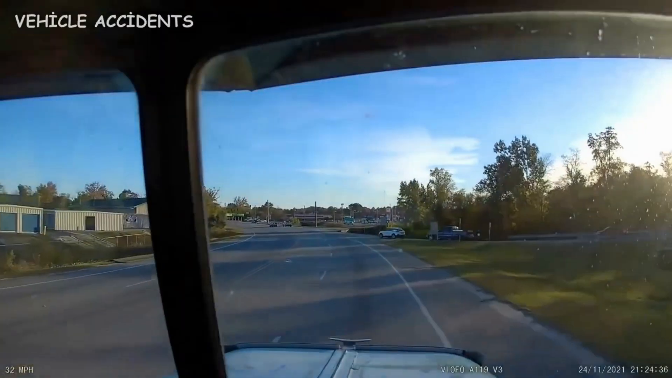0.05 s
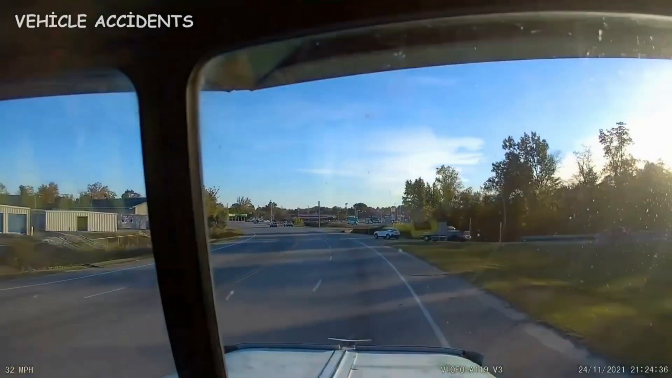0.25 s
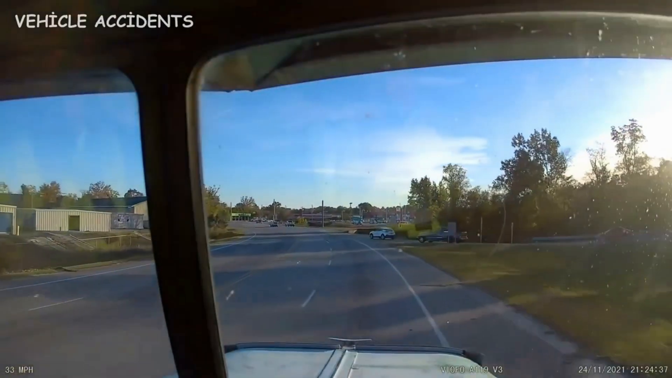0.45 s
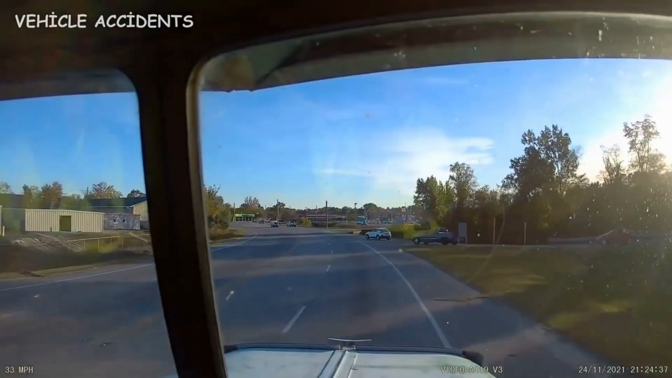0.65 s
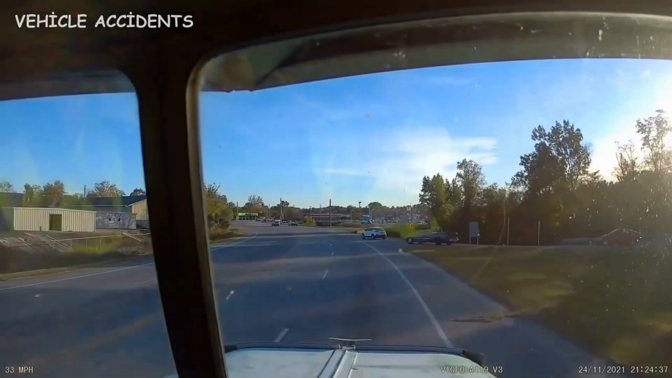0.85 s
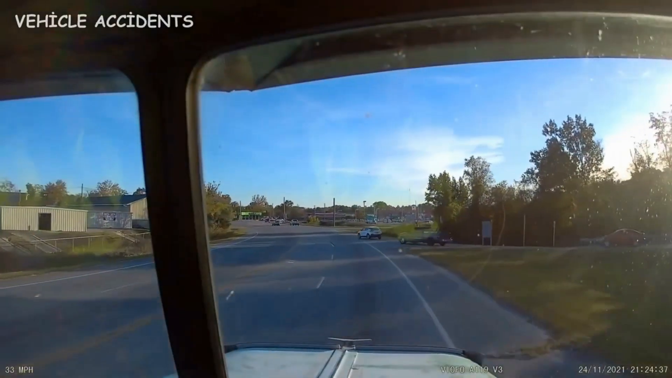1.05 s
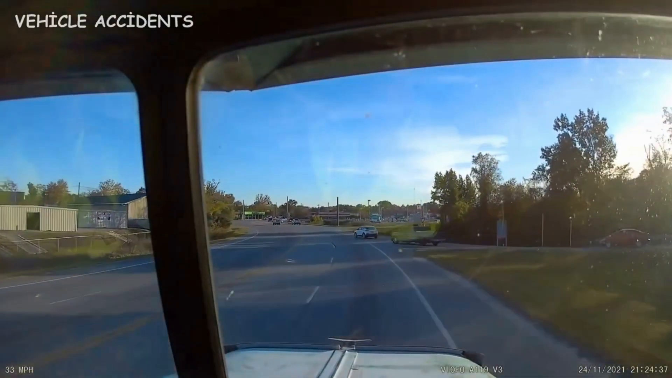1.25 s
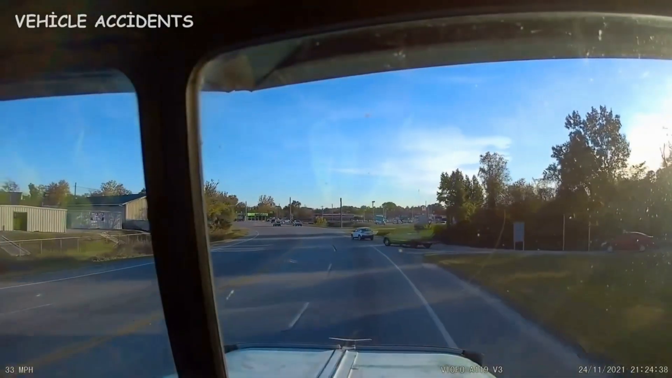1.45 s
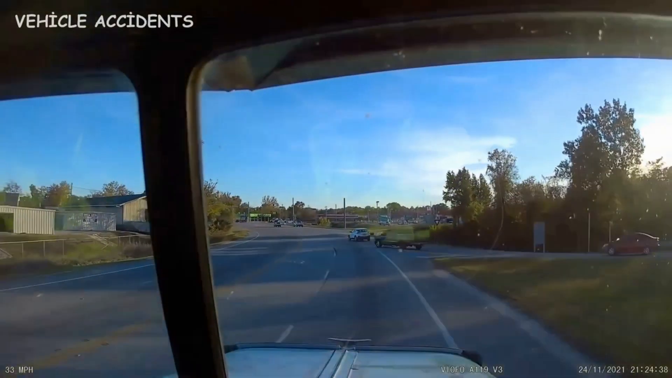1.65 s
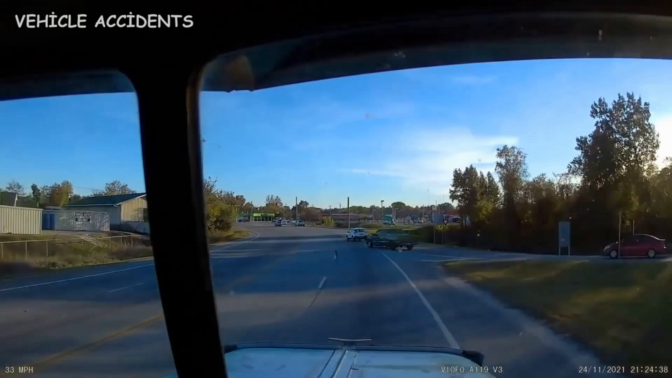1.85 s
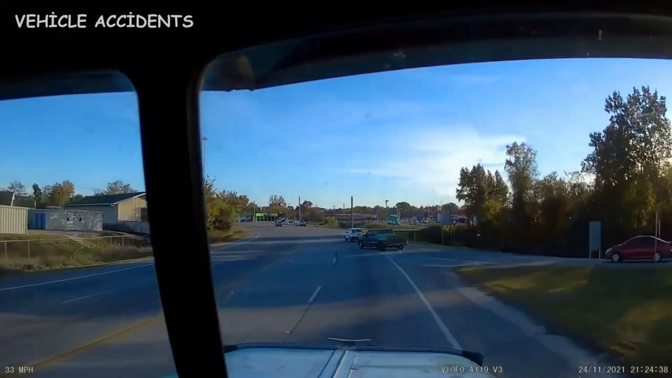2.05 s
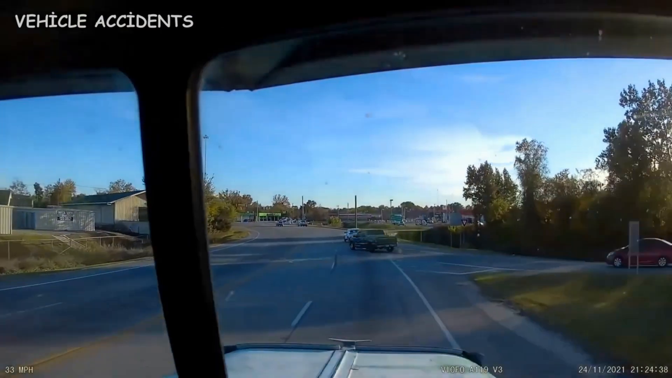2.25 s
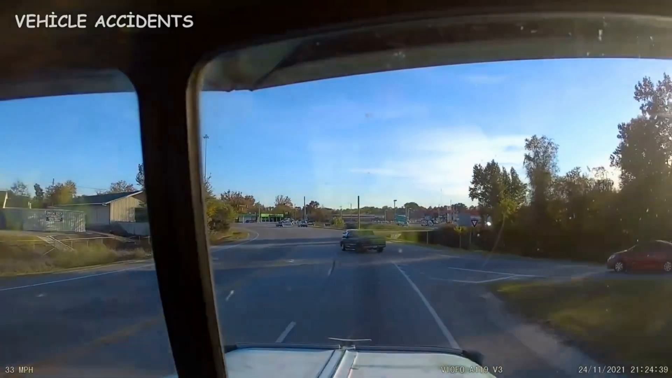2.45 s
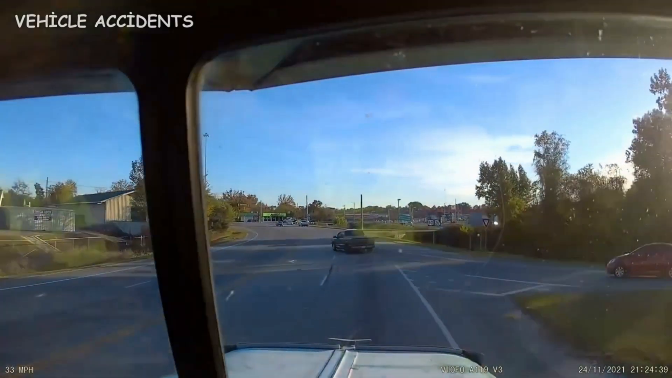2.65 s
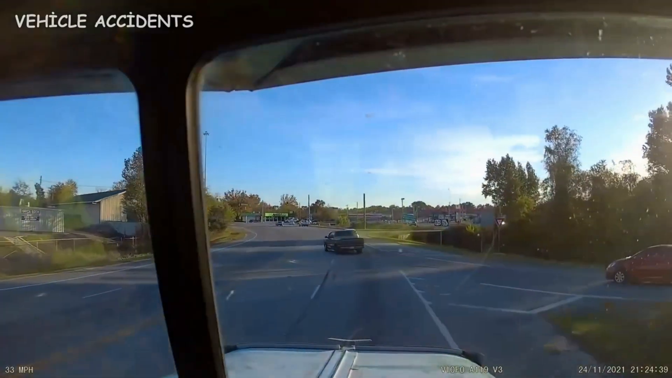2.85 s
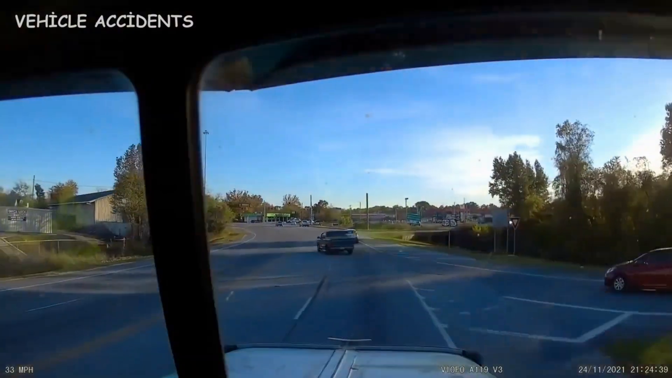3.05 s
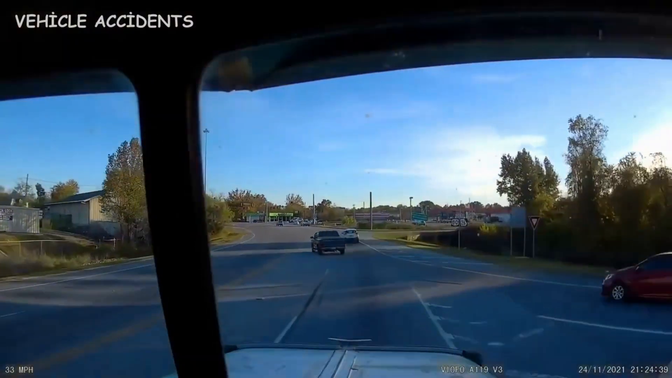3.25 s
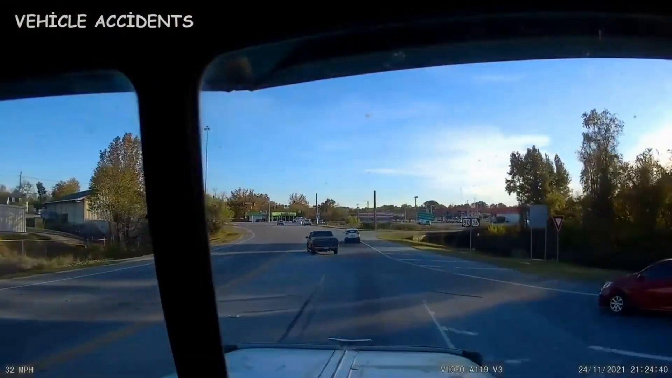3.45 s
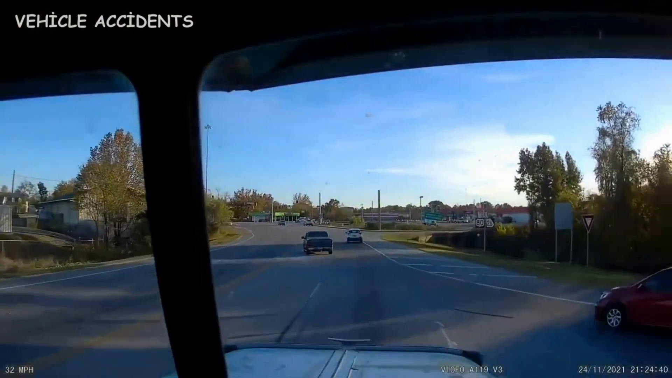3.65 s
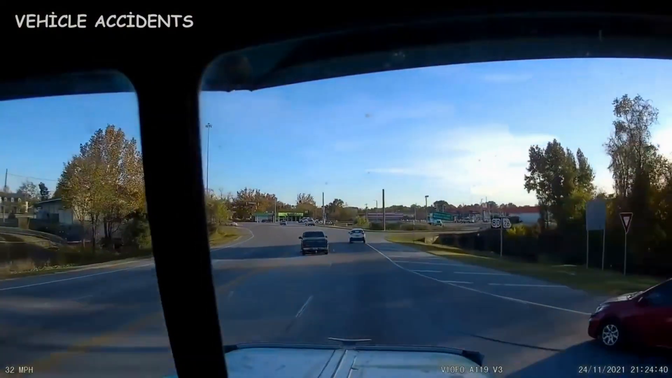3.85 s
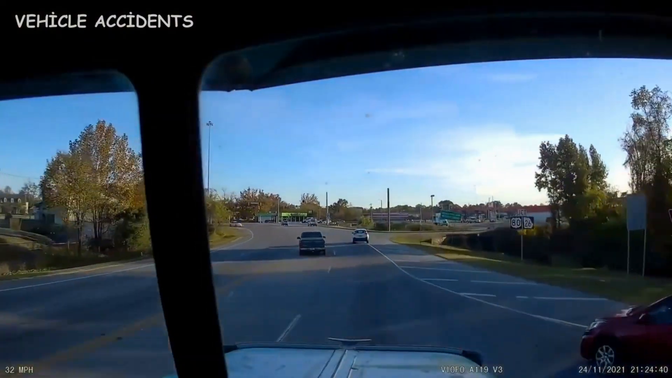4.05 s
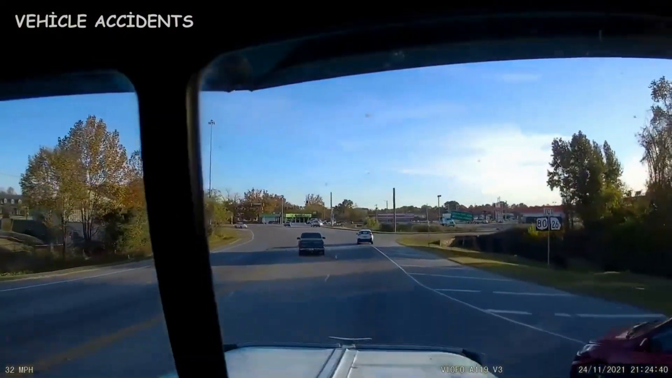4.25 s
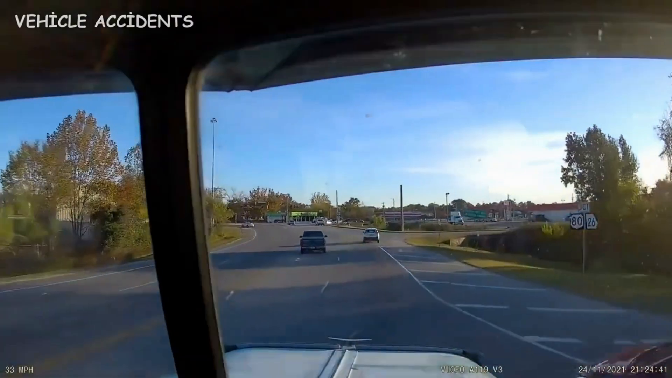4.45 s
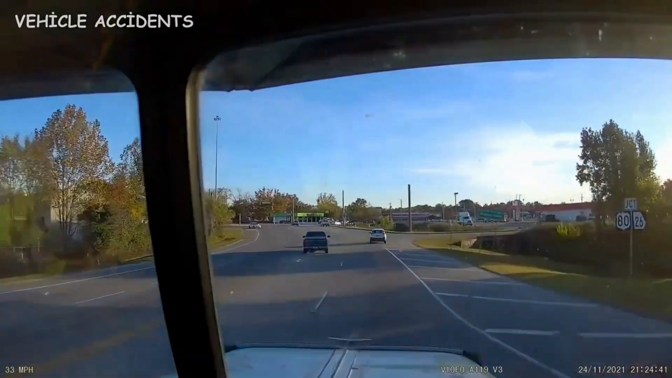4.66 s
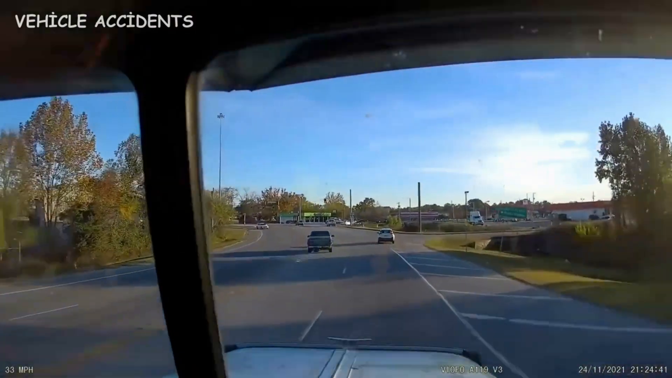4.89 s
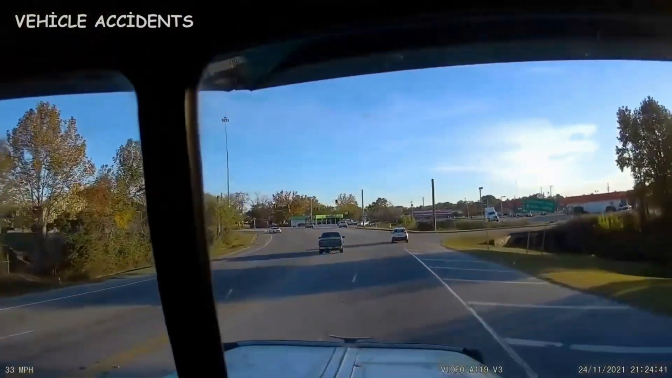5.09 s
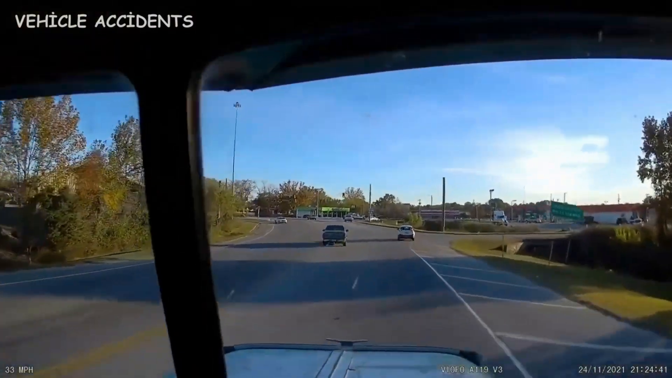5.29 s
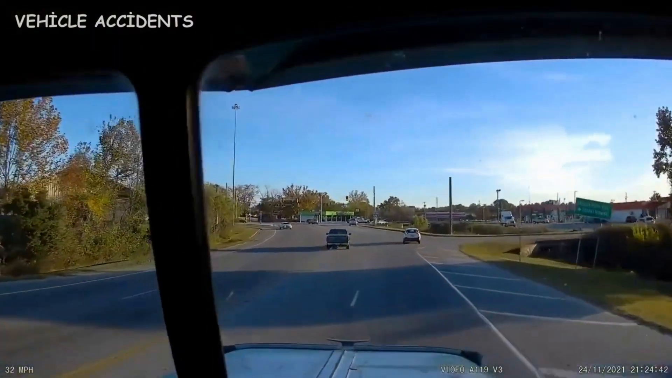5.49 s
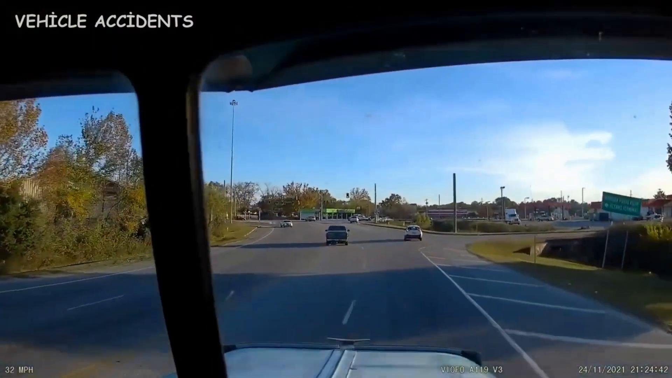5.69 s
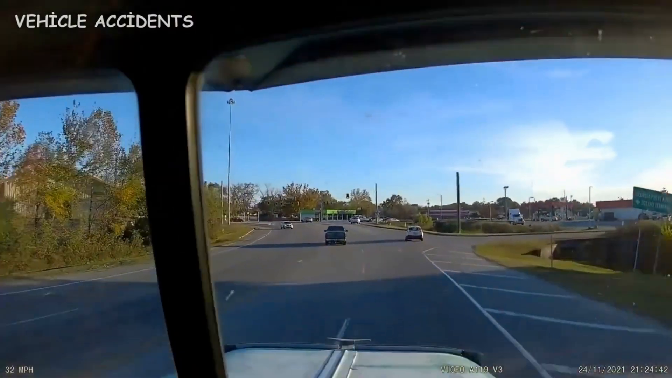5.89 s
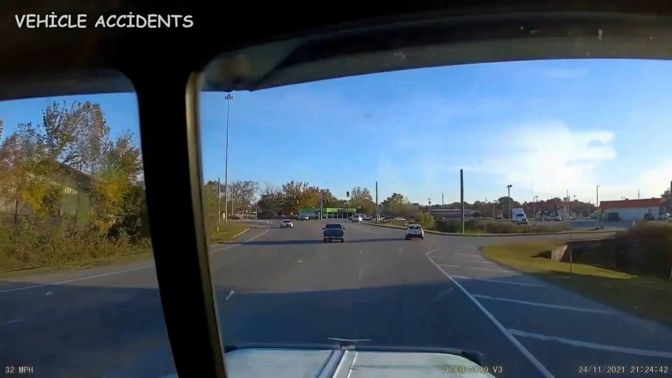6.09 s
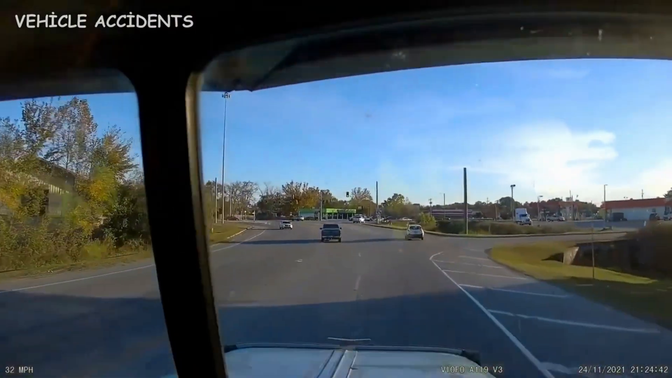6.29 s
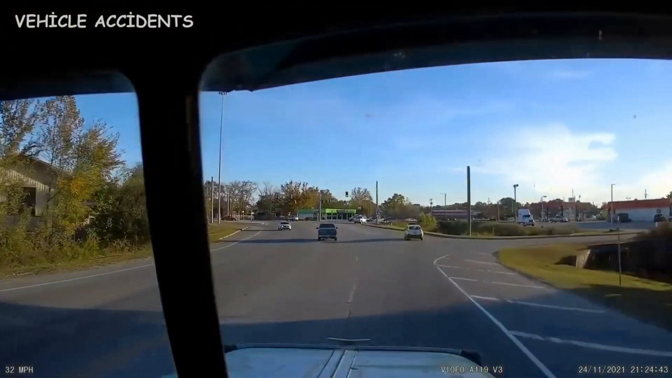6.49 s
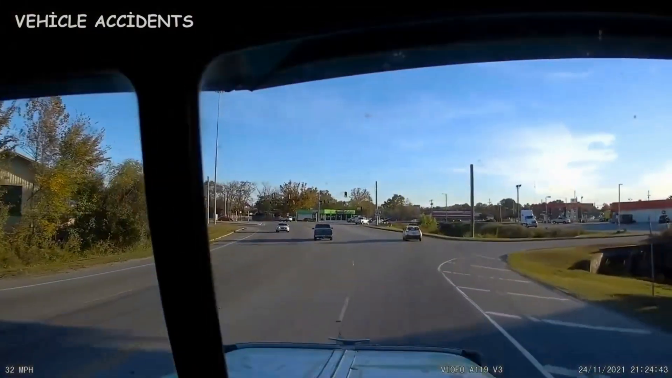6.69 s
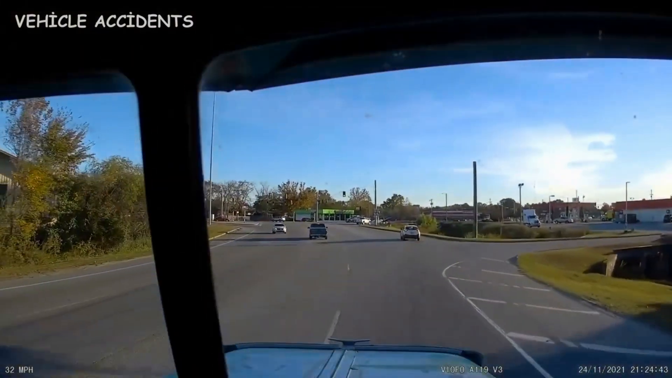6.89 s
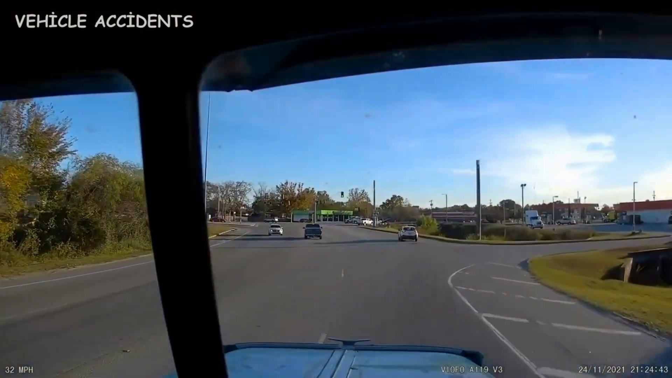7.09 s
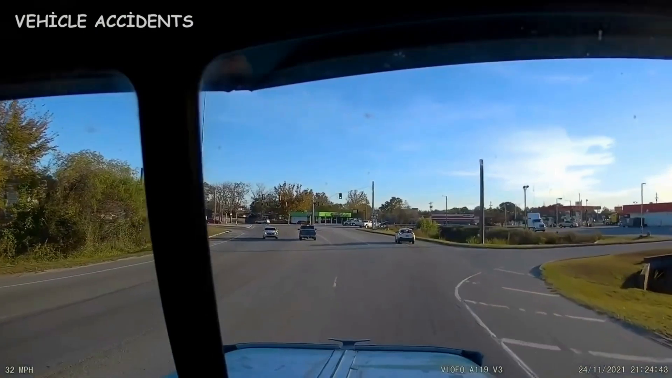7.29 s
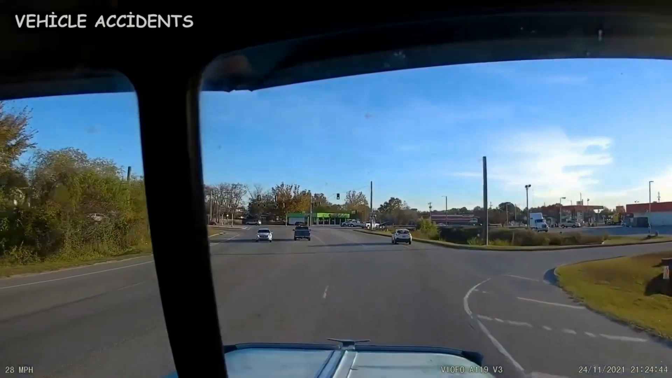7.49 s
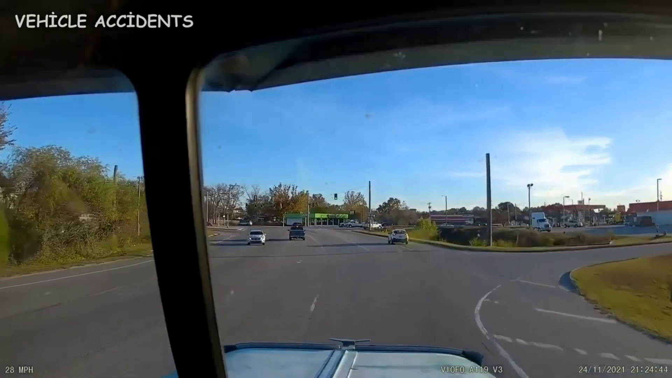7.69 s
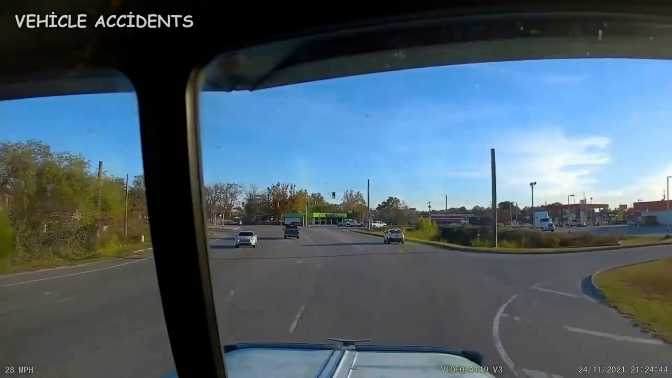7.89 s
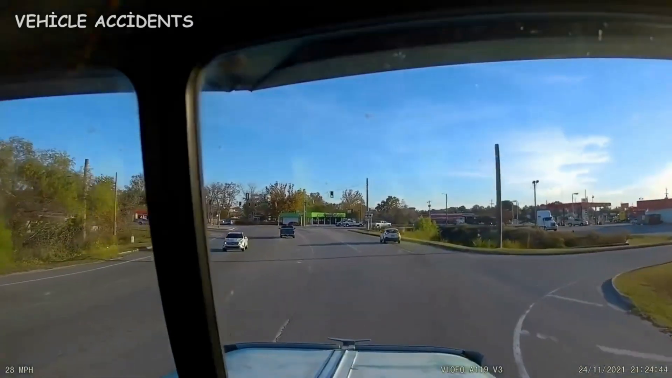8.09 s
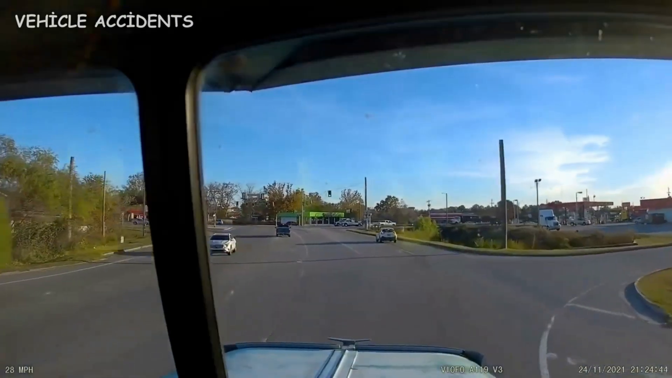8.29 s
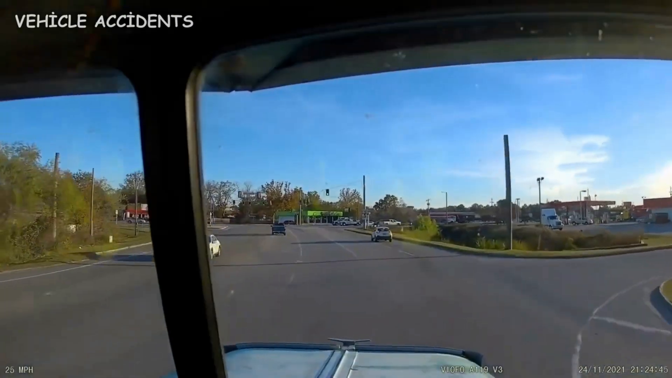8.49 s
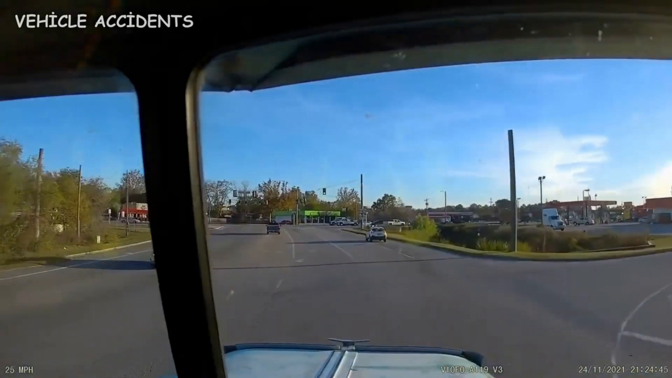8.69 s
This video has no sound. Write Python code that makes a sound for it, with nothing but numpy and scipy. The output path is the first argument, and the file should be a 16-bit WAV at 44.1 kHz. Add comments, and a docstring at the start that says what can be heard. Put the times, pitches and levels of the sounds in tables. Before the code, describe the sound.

Inside a rolling diesel truck cab, steady engine throb and tyre roar, then a short low air horn blast and a long crunching metal collision.

```python
"""A car strikes a diesel truck, heard in its cab: a long crunch of snaps, buckles, boom and heave,
with a second sharp bang; panels, parts and loose fittings ring, rattle and settle, scraps drop.
Just before, the driver yanks the air horn: a sum of harmonics with a rasp at each puff.
Under it the engine throbs (a sum of cycle orders), then slows off load, over filtered-noise
tyre roar and chassis rumble; two short whines and a long low hum sound as the truck slows."""
import sys
import numpy as np
from scipy import signal
from scipy.fft import rfft, irfft
from scipy.io import wavfile
from scipy.ndimage import uniform_filter1d

SR = 44100
rng = np.random.default_rng(int(sys.argv[2]) if len(sys.argv) > 2 else 0)


def generate_wav(signal):
    """Clip the signal to [-1, 1] and save it as 16-bit WAV at the path in sys.argv[1]."""
    frames = np.transpose(np.atleast_2d(signal))
    scaled = np.clip(frames, -1, 1) * 32767
    pcm = np.round(scaled).astype(np.int16)
    wavfile.write(sys.argv[1], SR, pcm)


N = 385413
TIME = np.arange(N) / SR
# In all tables dB is relative: gains, flutter and filters downstream add to it.


def amp(db):
    """Decibels to gain."""
    return 10 ** (np.asarray(db) / 20)


def unit(x):
    """Scales to rms 1."""
    return x / np.sqrt(np.mean(x ** 2) + 1e-20)


def since(s):
    """Seconds since a moment, zero before it."""
    return np.maximum(TIME - s, 0)


def decay60(t, t60_s):
    """Exponential decay, -60 dB at t60."""
    return np.exp(-np.log(1000) * t / t60_s)


def curve(rows):
    """Rows of t/s, value, joined by straight lines."""
    return np.interp(TIME, *np.transpose(rows))


def read(points, hz):
    """Spectrum in dB on a log-frequency axis, falling 30 dB/octave beyond its ends."""
    f, db = np.transpose(points)
    octave = np.log2(hz + 1)
    beyond = abs(octave - np.clip(octave, np.log2(f[0]), np.log2(f[-1])))
    return np.interp(octave, np.log2(f), db) - 30 * beyond


def colour(x, points, size=8192):
    """Minimum-phase filter with the given spectrum; keeps the power of white noise."""
    db = read(points, abs(np.fft.fftfreq(size, 1 / SR)))
    log_gain = np.log(amp(np.maximum(db, -100)))
    taps = np.fft.ifft(np.exp(np.conj(signal.hilbert(log_gain)))).real[:size // 2]
    return signal.oaconvolve(x, taps / np.linalg.norm(taps))[:N]


def butter(x, order, hz, kind="low"):
    """Butterworth filter."""
    return signal.sosfilt(signal.butter(order, hz, kind, fs=SR, output="sos"), x)


def ring(x, modes):
    """Parallel resonances: f/Hz, width/Hz, level/dB."""
    return sum(amp(db) * signal.lfilter(*signal.iirpeak(hz, hz / width, SR), x)
               for hz, width, db in modes)


def noise():
    """White noise of rms 1."""
    return rng.standard_normal(N)


def drift(rate_hz):
    """Slow random motion of rms 1, low-passed near rate_hz."""
    times = TIME[::32]
    hz = np.fft.rfftfreq(len(times), times[1])
    spectrum = rfft(rng.standard_normal(len(times))) / (1 + (hz / rate_hz) ** 4)
    return np.interp(TIME, times, unit(irfft(spectrum, len(times))))


def grains(per_s, spread_db):
    """Random tiny impacts of rms 1, their sizes spread exponentially in dB."""
    size = amp(spread_db * np.minimum(rng.exponential(1, N), 4))
    return unit(rng.choice([-1, 1], N) * size * (rng.random(N) < per_s / SR))


def strikes(rows, rise_s):
    """Envelope of blows that rise fast and die away: t/s, level/dB, t60/s."""
    power = np.zeros(N)
    for s, db, t60 in rows:
        start = round(s * SR)
        t = TIME[:N - start][:SR]
        blow = amp(db) * (1 - np.exp(-t / rise_s)) * decay60(t, t60)
        power[start:start + len(t)] += blow ** 2
    return np.sqrt(power)


def surges(rows):
    """Envelope of pushes that build to a peak and die away: t/s, level/dB, build/s, t60/s."""
    return np.sqrt(sum((amp(db) * np.exp(-np.maximum(s - TIME, 0) / build) * decay60(since(s), t60)) ** 2
                       for s, db, build, t60 in rows))


SLOWING_S = 5.04


def rolling(db, fade_db_per_s):
    """Gain of a rolling sound: steady, then fading linearly in dB as the truck slows."""
    return amp(db - fade_db_per_s * since(SLOWING_S))


# Partials of a struck part: f/pitch (before mistuning), level/dB
PART_MODES = [(1, 2), (1.07, -6), (1.43, -13.5), (1.83, -8), (2.8, -10.5), (3.27, -16.5)]


def clank(hz, t60_s, contact_cycles=1.36, damping=0.3, mistune=0.027):
    """One struck part: uneven partials, higher ones dying sooner; a large part is slow to start."""
    t, out = TIME[:SR // 4], 0
    for ratio, db in PART_MODES:
        partial_hz = hz * ratio ** (1 + mistune * rng.standard_normal())
        tone = np.sin(2 * np.pi * (partial_hz * t + rng.random()))
        out = out + amp(db) * decay60(t * ratio ** damping, t60_s) * tone * (partial_hz < SR / 2)
    return out * (1 - np.exp(-t * hz / contact_cycles))


def shards(hits, low_hz, high_hz, t60_s, count=40):
    """Each hit rings one random piece, from large and low to small and high; rms 1."""
    pieces = [clank(hz, t60_s * np.sqrt(low_hz / hz)) for hz in np.geomspace(low_hz, high_hz, count)]
    which, out = rng.integers(0, count, N), np.zeros(N + SR)
    for at in np.flatnonzero(hits):
        out[at:at + len(pieces[0])] += hits[at] * pieces[which[at]]
    return unit(out[:N])


# Spectra of crumpling metal, cab boom, frame heave: f/Hz, density/dB
METAL = [(150, -11.5), (250, -1.5), (380, 0.5), (500, -1), (800, -2), (980, -5), (1550, -4), (2200, -9),
         (3150, -14.5), (4400, -17.5), (6500, -27), (9200, -20), (12600, -26.5), (15500, -26)]
BOOM = [(60, -18), (90, -4), (120, -1), (165, 0), (240, 2.5), (290, -6), (350, -3), (480, -18.5)]
HEAVE = [(10, -22), (25, -2.5), (44, 0), (64, -4.5), (88, -4.5), (130, -16.5)]
# Car folding against the truck: peak t/s, build/s, t60/s, crunch/dB, boom/dB, heave/dB
# (build and t60 serve crunch and boom only)
SHOVES = [(5.108, 0.057, 0.77, -30.5, -21.5, -44), (5.21, 0.026, 0.31, -19, -21, -17),
          (5.3, .03, 0.3, -44, -34, -38), (5.43, 0.028, 0.2, -33.5, -31, -27),
          (5.47, 0.025, 0.54, -26, -45, -45), (5.55, 0.035, 0.17, -35, -44, -38)]
# heavy frame answers late, a short lurch for each shove
HEAVE_LAG_S, HEAVE_BUILD_S, HEAVE_T60_S = 0.022, 0.048, 0.12
SETTLE_S, TAIL_BUILD_S = 5.255, 0.039  # wreckage and cab coming to rest after the hardest shove
SCRAPE_TAIL_DB, SCRAPE_TAIL_T60_S = -31.5, 2.85
BOOM_TAIL_DB, BOOM_TAIL_T60_S = -31.5, 4
HEAVE_TAIL_DB, HEAVE_TAIL_T60_S = -32, 5.2


def collision(lumpy_db=3.0, boom_db=-2, heave_db=-1.0, buckle_db=-3, snap_db=-3, cavity_db=-7,
              cavity_hz=168, scrape_top_hz=5000, scrape_lumpy_db=2.0):
    """Sheet metal snaps and buckles in clumps, then scrapes duller; the cab booms, the frame heaves."""
    crunching = surges([(s, db, build, t60) for s, build, t60, db, _, _ in SHOVES])
    dragging = surges([(SETTLE_S, SCRAPE_TAIL_DB, TAIL_BUILD_S, SCRAPE_TAIL_T60_S)])
    dragging = dragging * amp(scrape_lumpy_db * drift(36.0))
    booming = surges([(s, db, build, t60) for s, build, t60, _, db, _ in SHOVES]
                     + [(SETTLE_S, BOOM_TAIL_DB, TAIL_BUILD_S, BOOM_TAIL_T60_S)])
    heaving = surges([(s + HEAVE_LAG_S, db, HEAVE_BUILD_S, HEAVE_T60_S) for s, *_, db in SHOVES]
                     + [(SETTLE_S, HEAVE_TAIL_DB, TAIL_BUILD_S, HEAVE_TAIL_T60_S)])
    snaps = colour(grains(per_s=1500, spread_db=1.0), METAL) * amp(lumpy_db * drift(41.0))
    buckles = shards(grains(per_s=120, spread_db=1.0), low_hz=328, high_hz=2570, t60_s=0.11)
    crunch = amp(snap_db) * snaps + amp(buckle_db) * buckles
    scrape = butter(colour(grains(per_s=1200, spread_db=-0.2), METAL), 2, scrape_top_hz)
    cavity = unit(ring(colour(noise(), BOOM), [(cavity_hz, 18, 0)]))
    boom = amp(boom_db) * colour(noise(), BOOM) + amp(cavity_db) * cavity
    heave = amp(heave_db) * colour(noise(), HEAVE)
    return crunch * crunching + scrape * dragging + boom * booming + heave * heaving


# Blows on panels: t/s, level/dB, t60/s, treble rel. level/dB, rattle shaken loose/dB
BANGS = [(4.3403, -17.5, 0.13, -1.5, -61), (4.431, -16.5, 0.056, -22, -66), (5.101, -22.5, 0.045, -12, -55),
         (5.127, -23, 0.047, -10, -45), (5.15, -33, .04, -6, -47), (5.1802, -9.5, 0.095, 5.5, -25.5),
         (5.197, -14.5, 0.083, 10, -36), (5.213, -14.5, 0.072, -4, -28), (5.236, -17, 0.071, -8, -41),
         (5.272, -23, 0.06, -10, -39), (5.293, -24, .04, -12, -50), (5.341, -27, 0.047, -12, -55),
         (5.408, -25, 0.055, -4, -35), (5.432, -24, 0.046, -14, -55), (5.461, -27, 0.08, -9, -50),
         (5.5135, -9.5, 0.089, -9, -23.5), (5.552, -26, .05, -8, -43), (5.593, -26, 0.044, -10, -57),
         (5.841, -31, 0.074, -4, -64), (6.265, -32.5, 0.17, -6, -66), (6.637, -36, 0.066, -14, -55),
         (7.04, -44, 0.12, -8, -57), (7.115, -39, 0.13, -2, -59), (7.53, -47, 0.11, -12, -59),
         (7.775, -45, 0.2, -15, -74)]
# Panel spectrum: f/Hz, density/dB
PANEL = [(71, -40), (120, 8), (192, 4), (325, -4), (676, -10), (1190, -9), (1460, -5), (1870, -10),
         (1990, -14), (3300, -12.5), (3580, -11), (8250, -37), (9130, -36), (14300, -30), (15500, -44)]
# Panel resonances: f/Hz, width/Hz, level/dB
PANEL_MODES = [(430, 15, -2), (662, 41, 3.5), (872, 145, -2.5), (1400, 30, -13), (2100, 33, -2),
               (2230, 29, -13), (2900, 36, -13), (3600, 45, -15), (4280, 61, -10)]


def bangs(crack_db=-2, modes_db=7, split_hz=3600):
    """Each blow is a noise burst that rings the panels; the harder, the more treble."""
    burst = noise()
    push = burst * strikes([(s, db, t60) for s, db, t60, _, _ in BANGS], rise_s=0.0014)
    snap = burst * strikes([(s, db + treble_db, t60) for s, db, t60, treble_db, _ in BANGS], rise_s=0.0042)
    force = butter(push, 6, split_hz) + butter(snap, 6, split_hz, "high")
    rung = butter(ring(force, PANEL_MODES), 2, 4500)
    return amp(crack_db) * colour(force, PANEL) + amp(modes_db) * rung


# Single parts knocked, cab walls to small brackets: t/s, level/dB, t60/s (lowest partial), f/Hz
KNOCKS = [(0.053, -20.5, 0.14, 173.5), (4.344, -20.5, .05, 950), (4.358, -21, .06, 239),
          (4.434, -24, 0.06, 1013), (4.934, -28.5, 0.11, 925), (5.046, -18.5, .19, 169.3),
          (5.093, -16, 0.1, 344.6), (5.098, -17, .08, 190), (5.12, -31, 0.073, 1260),
          (5.155, -14, 0.11, 238), (5.182, -18, .07, 740), (5.222, -21, 0.067, 1193),
          (5.252, -34, .06, 1560), (5.3, -17, .14, 151.3), (5.326, -34, .09, 415), (5.396, -20, .1, 123),
          (5.408, -25, .07, 486), (5.44, -16, .07, 105), (5.461, -28, 0.092, 1510), (5.516, -22, .035, 885),
          (5.518, -17, 0.061, 1422), (5.526, -22.5, 0.094, 650), (5.638, -35.5, 0.09, 1110),
          (5.662, -44, 0.072, 1693), (5.815, -38, 0.14, 399), (5.848, -34, 0.074, 562),
          (5.902, -30, 0.065, 215), (5.944, -39, 0.073, 828), (6.312, -41, 0.074, 1360),
          (6.384, -37.5, 0.13, 427), (6.859, -45, .07, 910), (6.935, -57, 0.061, 2080),
          (7.522, -46, 0.17, 820)]


def knocks():
    """Brackets, trim and bodywork, each ringing at its own pitch."""
    out = np.zeros(N + SR)
    for s, db, t60, hz in KNOCKS:
        sound, start = amp(db) * clank(hz, t60), round(s * SR)
        out[start:start + len(sound)] += sound
    return out[:N]


# Loose fittings clattering on their own: t/s, level/dB, t60/s, brightest f/Hz
RATTLES = [(0.01, -58, .7, 5500), (1.708, -48.5, 0.1, 4430), (1.772, -50, 0.049, 9000),
           (1.832, -55, .1, 7000), (4.29, -47.5, 0.19, 11000), (4.359, -34.5, 0.13, 11800),
           (4.37, -29.5, 0.031, 13000), (5.05, -39.5, 0.068, 13000), (5.148, -34, 0.16, 4630),
           (5.237, -17.5, 0.028, 9000), (5.362, -28, 0.055, 9950), (5.382, -25, 0.058, 9800),
           (5.464, -28.5, 0.036, 13000), (5.748, -32.5, 0.016, 8000), (5.835, -46.5, 0.055, 6000),
           (5.895, -52.5, 0.13, 4000), (5.967, -50, 0.014, 5000), (6.062, -41, 0.29, 7550),
           (6.296, -51, 0.022, 6500), (6.34, -56, 0.27, 6000), (8.01, -63, 0.41, 5030),
           (8.05, -60.5, 0.54, 2660)]
# Fitting spectrum: f/Hz, density/dB
FITTING = [(700, -23), (1800, 20), (3200, 12.5), (5000, 1), (8000, 1), (10000, 2.5), (13500, -3),
           (16000, -5.5)]
# Ringing of small metal fittings: f/Hz, width/Hz, level/dB
JINGLE = [(3310, 260, 11), (4400, 130, 0), (5440, 54, -1), (5450, 23, -10), (7960, 84, -0.5),
          (12000, 120, -9)]
SHAKEN_LAG_S, SHAKEN_HZ = 0.004, 5160  # rattle following each blow
CHATTER_DB, CHATTER_FADE_DB_PER_S = -70, 1.2


def fittings(clump_db=6.0, clump_limit=2.06, jingle_db=-6, q=0.99, clatter_db=2, rise_share=0.061,
             stirred_db=-63, stirred_t60_s=7.0):
    """Loose parts clatter at jolts, each in its register, and chatter, more once the horn stirs them."""
    stirred = surges([(HORN_ON_S, stirred_db, HORN_ATTACK_S, stirred_t60_s)])
    unrest = rolling(CHATTER_DB, CHATTER_FADE_DB_PER_S) + stirred
    clumps = amp(clump_db * np.minimum(drift(34), clump_limit))
    taps = grains(per_s=7000, spread_db=-0.5) * unrest * clumps
    snaps, t = grains(per_s=12000, spread_db=0.0), TIME[:SR // 3]
    shaken = [(s + SHAKEN_LAG_S, db, t60, SHAKEN_HZ) for s, _, t60, _, db in BANGS]
    for s, db, t60, hz in RATTLES + shaken:
        span = slice(round(s * SR), round(s * SR) + len(t))
        part = unit(signal.lfilter(*signal.iirpeak(hz, q, SR), snaps[span]))
        build = 1 - np.exp(-t / (rise_share * t60))  # a long rattle takes longer to get going
        taps[span] += part * amp(db + clatter_db) * build * decay60(t, t60)
    return colour(taps, FITTING) + amp(jingle_db) * np.std(taps) * unit(ring(taps, JINGLE))


DEBRIS_DB, DEBRIS_T60_S, DEBRIS_PER_S = -41.5, 3.6, 70


def debris(tick_db=-13, scatter_db=4.5):
    """Scraps drop singly as the wreck settles; each ticks and rings with its own note."""
    falls = grains(per_s=DEBRIS_PER_S, spread_db=scatter_db)
    scraps = shards(falls, low_hz=656, high_hz=4120, t60_s=0.31) + amp(tick_db) * colour(falls, FITTING)
    return scraps * surges([(SETTLE_S, DEBRIS_DB, .03, DEBRIS_T60_S)])


def cab_echo(x, t60_s=0.2, wet_db=-10):
    """Short dull echo of a small upholstered cab: decaying noise, low-passed."""
    t = TIME[:SR // 3]
    taps = rng.standard_normal(len(t)) * decay60(t, t60_s) * (t > .003)
    taps = butter(taps / np.linalg.norm(taps), 1, 6000)
    return x + amp(wet_db) * signal.oaconvolve(x, taps)[:N]


# Horn harmonics: number, level/dB (the first also gets the HORN_BOOM curve added to it)
HORN_TONE = [(1, 0.5), (2, -13.5), (3, -13.5), (4, -15.5), (5, -24.5), (6, -13), (7, -10), (8, -22.5),
             (9, -27), (10, -30.5), (11, -25.5), (12, -32), (13, -29), (14, -25), (15, -31.5), (16, -24),
             (17, -39), (18, -38), (19, -40), (21, -36), (25, -34), (26, -38), (27, -35), (29, -43),
             (33, -45.5), (48, -43), (49, -45.5)]
# Faint buzz of all other harmonics: f/Hz, level/dB
HORN_BUZZ = [(3300, -54), (5200, -54.5), (6000, -69), (7500, -59), (8500, -61), (12000, -77), (15000, -67)]
# Rasp of air in the bell and of trim buzzing along: f/Hz, width/Hz, level/dB
HORN_RASP = [(900, 97, 11), (1550, 130, -11), (4400, 190, -23), (7820, 200, -27)]
# Horn fundamental in the cab, added to its HORN_TONE level: t/s, level/dB
HORN_BOOM = [(4.385, -30), (4.41, -19.5), (4.45, -22.5), (4.485, -26.5), (4.565, -20), (4.64, -25),
             (4.73, -19.5), (4.828, -19.5), (4.878, -32), (4.915, -23), (4.985, -19), (5.01, -24.5)]
HORN_ON_S, HORN_OFF_S, HORN_HZ, HORN_DB = 4.338, 4.942, 164.5, -23  # one pull of the cord
HORN_ATTACK_S, HORN_RELEASE_S = 0.035, 0.055  # air pressure builds, then bleeds away
HORN_SHARP_HZ, HORN_SETTLE_S, HORN_SAG_HZ = 2.2, 0.044, 1.7  # starts sharp, flattens as pressure drops


def horn(waver=0.00086, brighten=1.5, air_db=-27, rasp_db=-25.5, cab_hold=.45, rasp_flutter_db=3.0,
         boom_db=-0.5, shimmer_db=1.5, jitter_rad=0.0097, ring_on_s=0.2, count=90):
    """A diaphragm chops the air; upper harmonics need more pressure, and each puff rasps."""
    dropped = (since(HORN_OFF_S) / HORN_RELEASE_S) ** 2
    pressure = (1 - np.exp(-since(HORN_ON_S) / HORN_ATTACK_S)) * np.exp(-np.minimum(dropped, 20))
    sharp_hz = HORN_SHARP_HZ * np.exp(-since(HORN_ON_S) / HORN_SETTLE_S)
    hz = HORN_HZ + sharp_hz - HORN_SAG_HZ * (1 - np.exp(-dropped))
    angle = 2 * np.pi * np.cumsum(hz * (1 + waver * drift(25))) / SR
    on = (TIME > HORN_ON_S) & (TIME < HORN_OFF_S + ring_on_s)
    tone, voice, shimmer = dict(HORN_TONE), np.zeros(N), [drift(28)[on] for _ in range(11)]
    cab_boom_db = uniform_filter1d(curve(HORN_BOOM), size=1300)[on]
    tone[1] = tone[1] + boom_db + cab_boom_db - HORN_DB
    for k in range(1, count):
        # random phase for each harmonic, random level for the faint ones
        db = tone[k] if k in tone else read(HORN_BUZZ, k * HORN_HZ) + rng.normal(0, 2.7)
        drive = pressure[on] ** brighten * amp(shimmer_db * shimmer[k % len(shimmer)])
        blown = drive ** np.log10(k) * pressure[on] ** cab_hold  # the cab holds low notes longest
        shake = jitter_rad * shimmer[(k + 2) % len(shimmer)]  # scaled by k below: higher is rougher
        voice[on] += amp(db) * blown * np.cos(k * (angle[on] + shake) + 2 * np.pi * rng.random())
    air = colour(noise(), ROAD)
    puffs = noise() * (1 + np.cos(angle)) ** 2
    rasp = unit(ring(puffs, HORN_RASP)) * amp(rasp_db + rasp_flutter_db * drift(14))
    return amp(HORN_DB) * (np.sqrt(2) * voice + pressure * (amp(air_db) * air + rasp))


# Engine speed: t/s, four-stroke cycle f/Hz
SPEED = [(0, 12.68), (0.3, 12.65), (0.7, 12.52), (1.25, 12.63), (1.9, 12.43), (2.5, 12.48), (3.05, 12.42),
         (3.4, 12.43), (5.1, 12.1), (6.0, 10.1), (6.3, 9.84), (7.1, 9.66), (7.8, 8.92), (8.07, 8.25),
         (8.4, 7.86), (8.74, 7.7)]
# Multiples of the engine cycle: order, loaded/dB, coasting/dB
ENGINE_ORDERS = [(2, -51, -53), (3, -51.5, -48), (5, -51, -52), (7, -49, -64), (8, -60, -62), (9, -51, -59),
                 (10, -47, -51.5), (12, -44, -50), (13, -46.5, -54), (14, -37.5, -73.5), (15, -49.5, -51),
                 (16, -55.5, -79), (17, -66, -70), (18, -49.5, -50), (19, -63, -66), (20, -52, -47),
                 (21, -56, -74), (24, -65, -53.5), (30, -64, -68), (32, -54.5, -84), (36, -71, -59),
                 (40, -74, -77), (48, -57, -63.5)]
# Cab resonances lifting each order that slides through: f/Hz, width/Hz, lift/dB
CAB = [(107.7, 4.6, 12.5), (160.7, 9, 10.5), (191.2, 10.5, 3.5), (230.2, 4.3, 13), (358, 10, 19)]
ENGINE_DB = -2
LIFT_S, LIFT_TAKES_S, COAST_LOAD = 5.33, 0.44, 0.076  # driver comes off the throttle; load left, 0-1


def engine(first_throb_s=.071, uneven_db=1.5, wander_rad=0.049, smear_rad=.09, boom_hz=170):
    """Unequal cylinders give many orders; they line up once a cycle, so the cab throbs."""
    speed_hz = curve(SPEED)
    load = np.clip(1 - since(LIFT_S) / LIFT_TAKES_S, COAST_LOAD, 1)
    angle = 2 * np.pi * (np.cumsum(speed_hz) / SR - first_throb_s * speed_hz[0])
    shudder, out = [drift(5.2) for _ in range(5)], np.zeros(N)
    for order, loaded_db, coasting_db in ENGINE_ORDERS:
        lift_db = sum(db / (1 + (2 * (order * speed_hz - hz) / width) ** 2) for hz, width, db in CAB)
        level = amp(load * loaded_db + (1 - load) * coasting_db + lift_db)
        # the shell delays each order differently, rounding the throb
        lag = smear_rad * (order - boom_hz / speed_hz[0]) ** 2
        out += level * np.cos(order * angle - lag + wander_rad * shudder[order % len(shudder)])
    return np.sqrt(2) * out * amp(ENGINE_DB + uneven_db * drift(9.4))


# Thin tones as the truck slows, two short whines and a long low hum:
# peak t/s, half length to 1/e/s, f/Hz, glide/(Hz/s), level/dB
WHINES = [(7.853, 0.14, 950, -130, -54.5), (8.088, .028, 5100, 0, -66), (8.297, 0.57, 433.4, -7.5, -54.5)]


def whines(waver=0.01, flutter_db=4.0, rough=0.27, roughness_hz=45):
    """Thin tones swell and sink, their level broken up by fast random motion."""
    out = np.zeros(N)
    for s, half_s, hz, glide, db in WHINES:
        pitch_hz = (hz + glide * (TIME - s)) * (1 + waver * drift(26.6))
        swell = amp(db + flutter_db * drift(14)) * np.exp(-((TIME - s) / half_s) ** 2)
        breakup = np.sqrt(1 - rough) + np.sqrt(rough) * drift(roughness_hz)
        out += np.sqrt(2) * swell * breakup * np.cos(2 * np.pi * np.cumsum(pitch_hz) / SR)
    return out


# Tyres and wind; chassis: f/Hz, density/dB
ROAD = [(160, -24), (280, -2.5), (385, 1), (450, 0), (570, -6.5), (710, -1), (795, -7), (920, -3.5),
        (1020, -7.5), (1450, -6), (1800, -11), (2800, -21.5), (4500, -32), (6500, -44), (9500, -51.5)]
RUMBLE = [(8, -15), (18, -1.5), (30, -0.5), (48, -5), (76, -12.5), (102, -3.5), (135, -5), (175, -2.5),
          (250, -4.5), (285, -17.5), (420, -40.5)]
ROAR_DB, ROAR_FADE_DB_PER_S = -41, 2.5
RUMBLE_DB, RUMBLE_FADE_DB_PER_S = -36, 2.27
TREAD_DB, TREAD_FADE_DB_PER_S = -54, 16


def road(flutter_db=0.78, rumble_flutter_db=1.0, tread_hz=920, tread_width_hz=75):
    """Tyre roar and chassis rumble as coloured noise, with a narrow-band tread whine."""
    roar = colour(noise(), ROAD) * rolling(ROAR_DB, ROAR_FADE_DB_PER_S) * amp(flutter_db * drift(18.0))
    tread = [(tread_hz, tread_width_hz, 0)]
    whine = unit(ring(ring(noise(), tread), tread)) * rolling(TREAD_DB, TREAD_FADE_DB_PER_S)
    rumble = colour(noise(), RUMBLE) * rolling(RUMBLE_DB, RUMBLE_FADE_DB_PER_S)
    return roar + whine + rumble * amp(rumble_flutter_db * drift(14.0))


def scene():
    """Everything heard behind the windscreen; only impacts and rattles get the cab echo."""
    impacts = cab_echo(collision() + bangs() + knocks() + fittings() + debris())
    return (impacts + horn() + engine() + whines() + road())[None]


# Microphone hiss: f/Hz, density/dB
HISS = [(3000, 11), (8000, -8), (9500, 6), (12000, -3.5), (13700, 10), (15000, 2)]
# Dips of the microphone housing: f/Hz, width/Hz, depth 0-1
NOTCHES = [(2207, 375, 0.45), (3620, 890, 0.6), (9430, 1430, 0.57)]
EDGE_HZ = 15550


def record(dry, ceiling=0.44, hiss_db=-77):
    """Small microphone: faint hiss, dips from its housing, rounded peaks, treble cut at EDGE_HZ."""
    heard = dry + amp(hiss_db) * colour(noise(), HISS)
    for hz, width, depth in NOTCHES:
        heard = heard - depth * ring(heard, [(hz, width, 0)])
    held = heard / (1 + (heard / ceiling) ** 4) ** (1 / 4)
    lowpass = signal.firwin(511, EDGE_HZ, window=("kaiser", 9), fs=SR)
    return signal.oaconvolve(held, lowpass[None], "same")


dry = scene()
out = record(dry)
generate_wav(out)
```